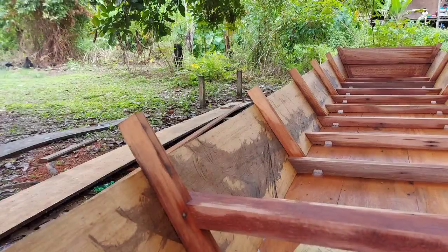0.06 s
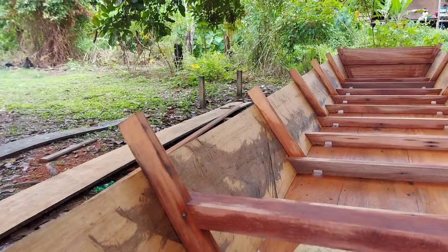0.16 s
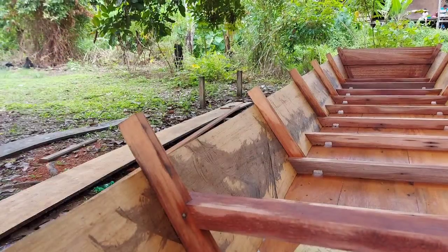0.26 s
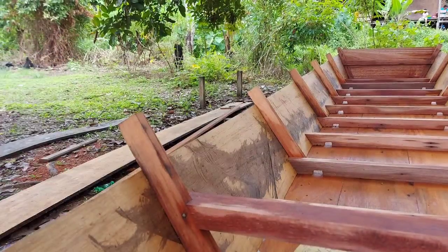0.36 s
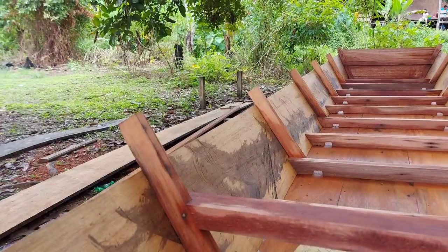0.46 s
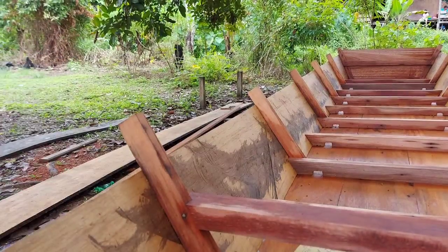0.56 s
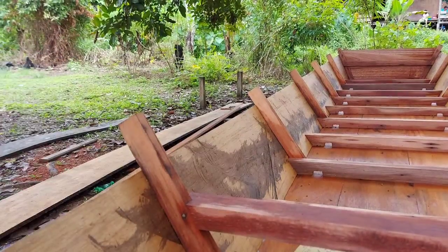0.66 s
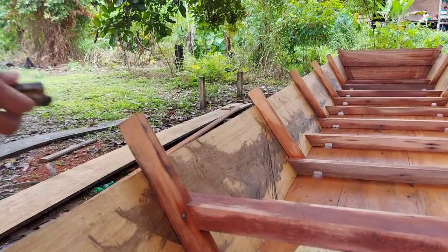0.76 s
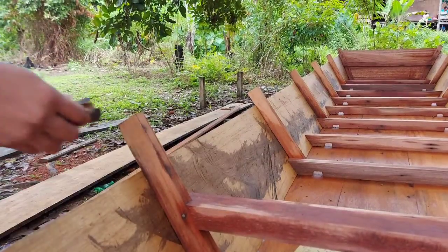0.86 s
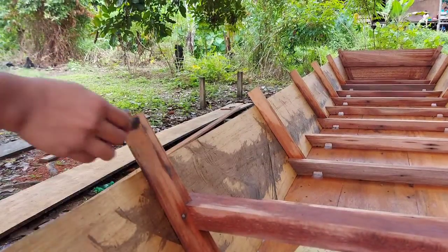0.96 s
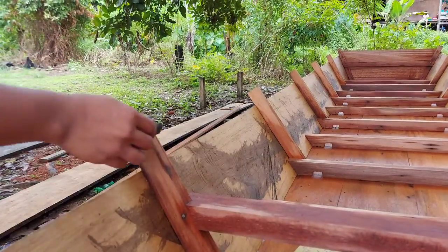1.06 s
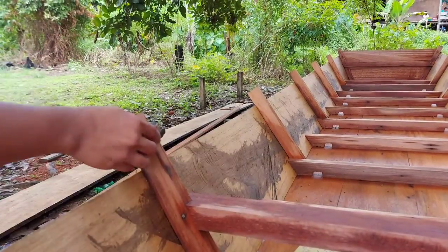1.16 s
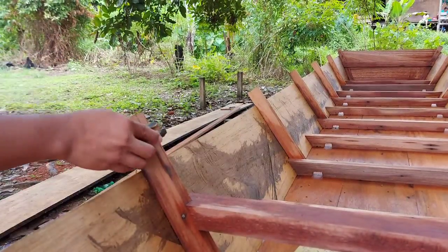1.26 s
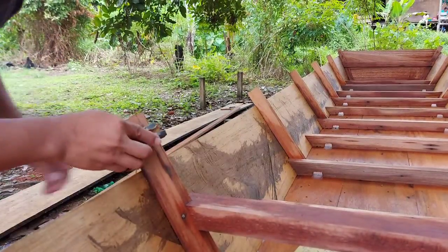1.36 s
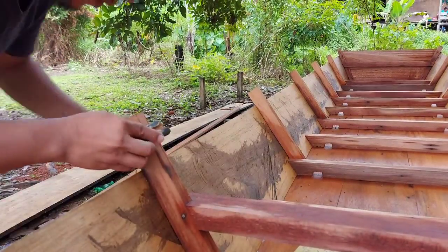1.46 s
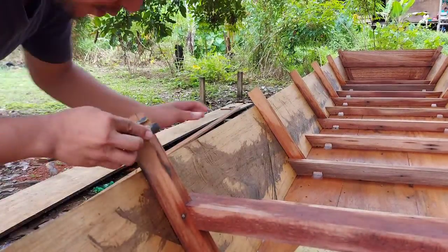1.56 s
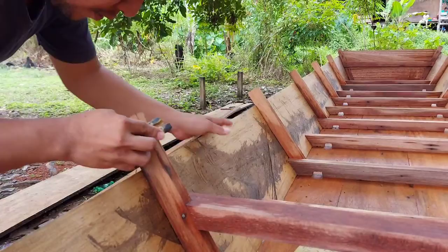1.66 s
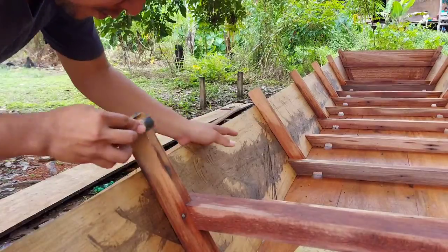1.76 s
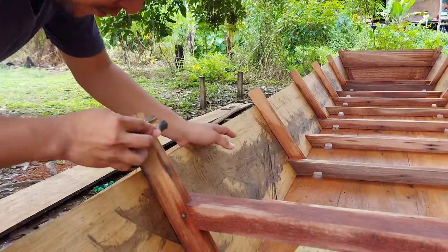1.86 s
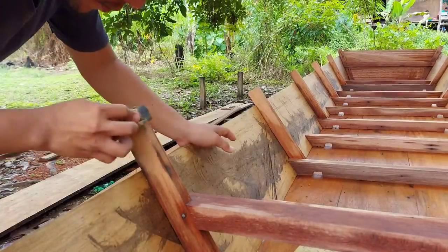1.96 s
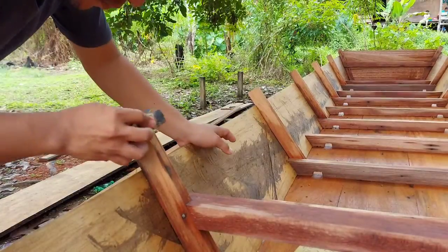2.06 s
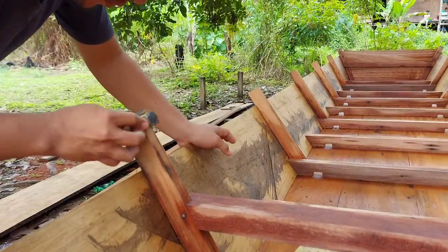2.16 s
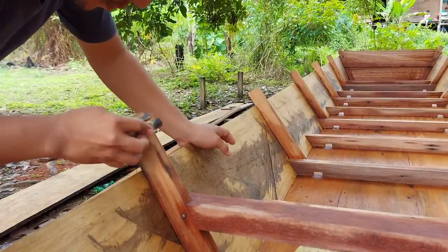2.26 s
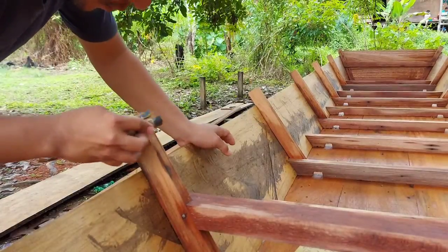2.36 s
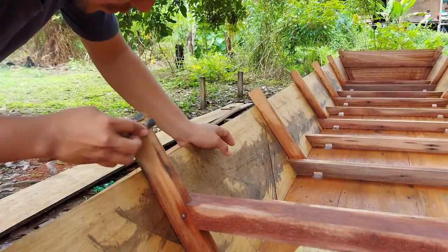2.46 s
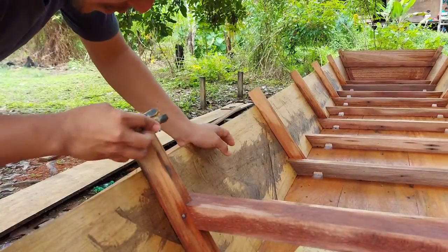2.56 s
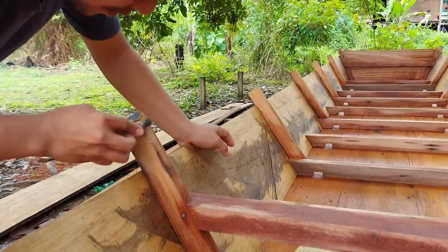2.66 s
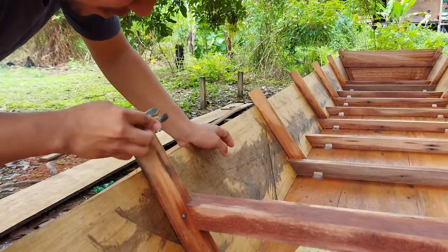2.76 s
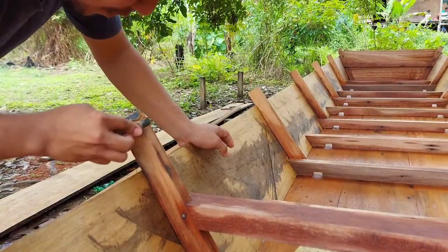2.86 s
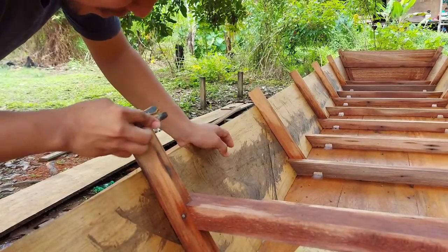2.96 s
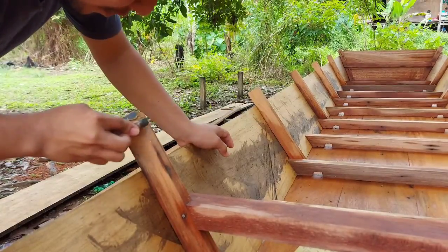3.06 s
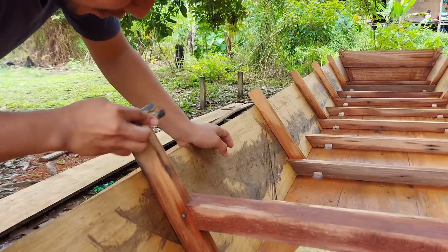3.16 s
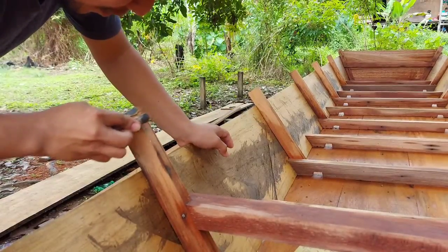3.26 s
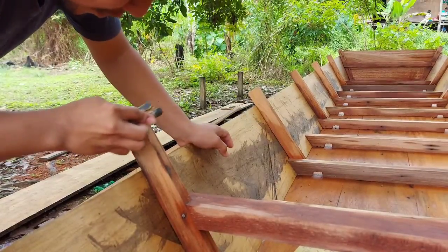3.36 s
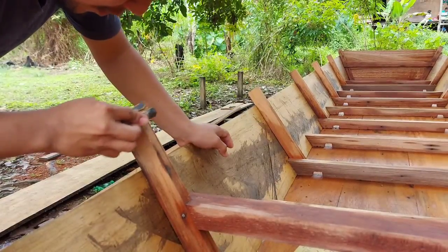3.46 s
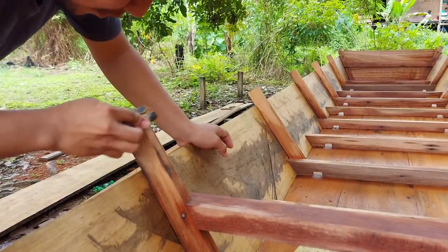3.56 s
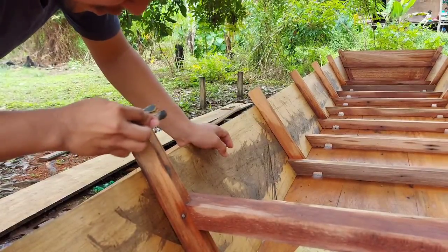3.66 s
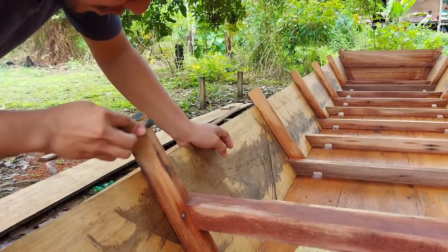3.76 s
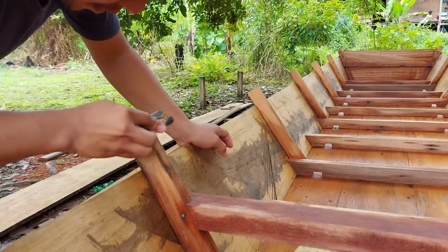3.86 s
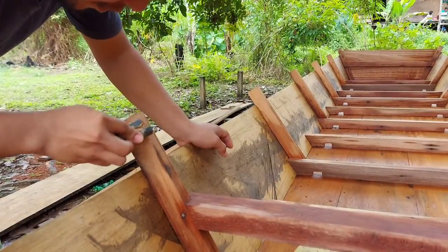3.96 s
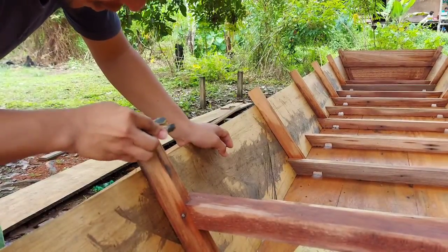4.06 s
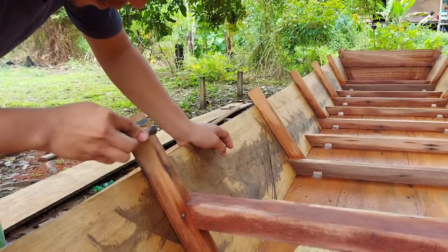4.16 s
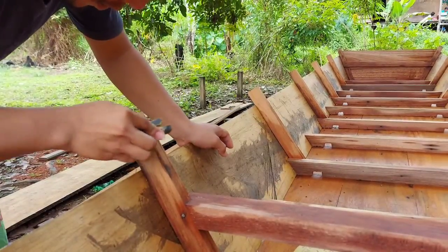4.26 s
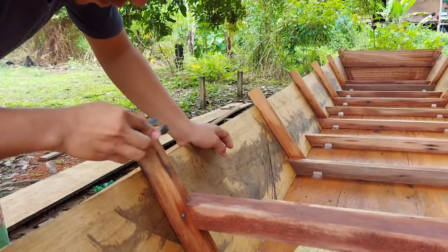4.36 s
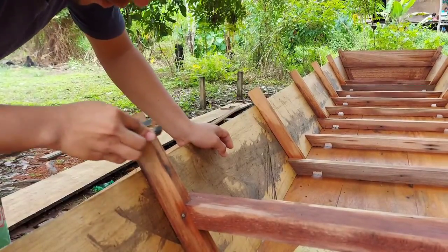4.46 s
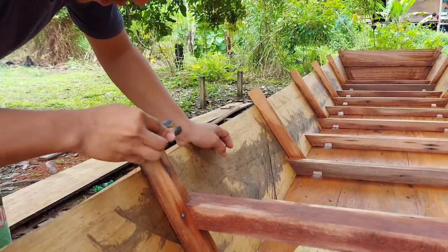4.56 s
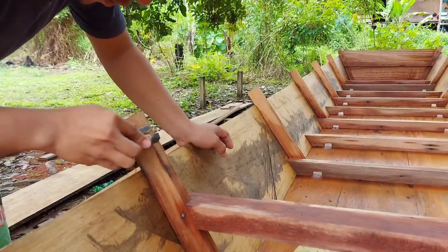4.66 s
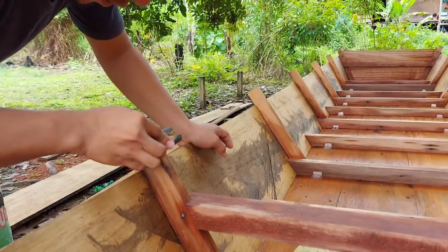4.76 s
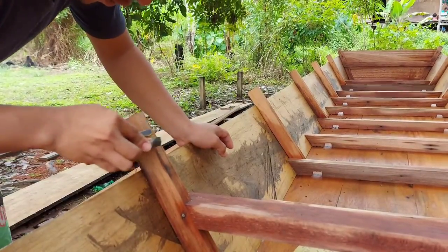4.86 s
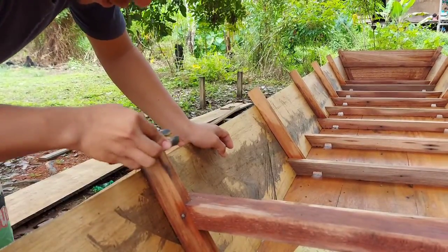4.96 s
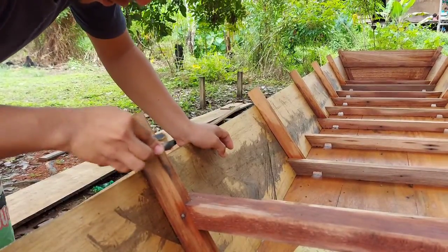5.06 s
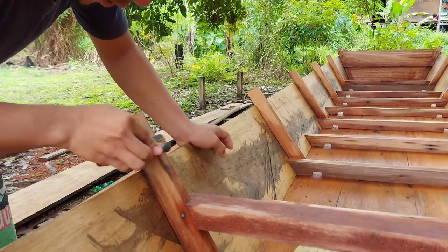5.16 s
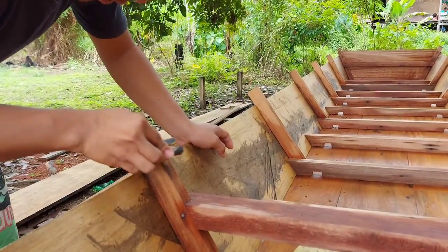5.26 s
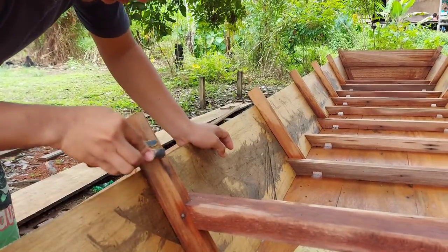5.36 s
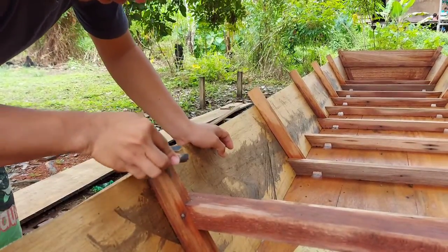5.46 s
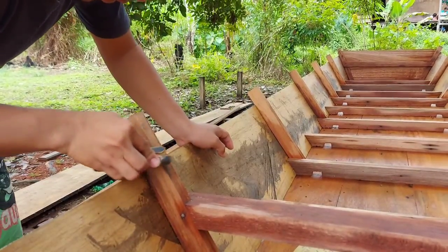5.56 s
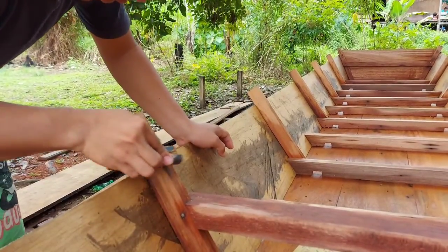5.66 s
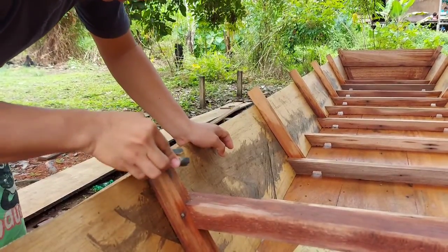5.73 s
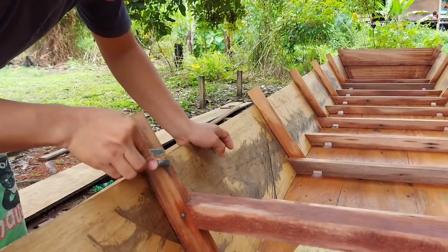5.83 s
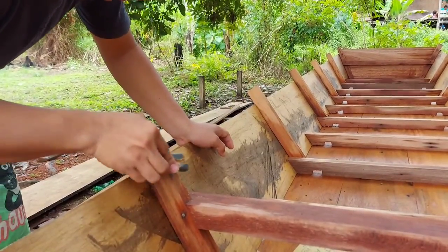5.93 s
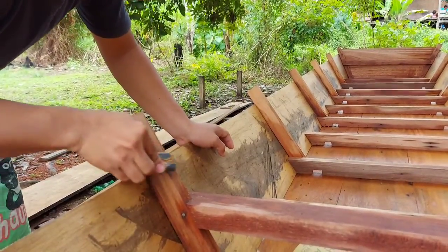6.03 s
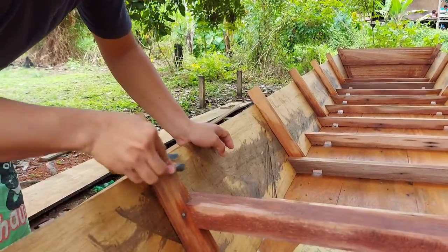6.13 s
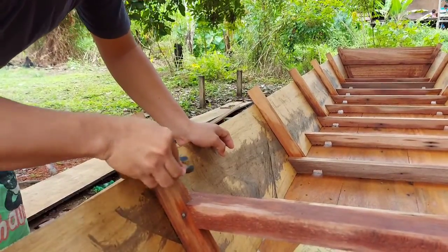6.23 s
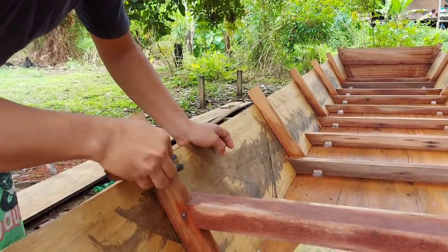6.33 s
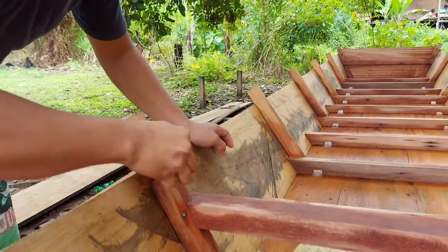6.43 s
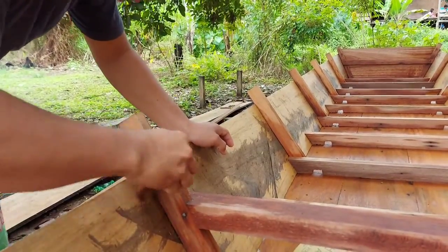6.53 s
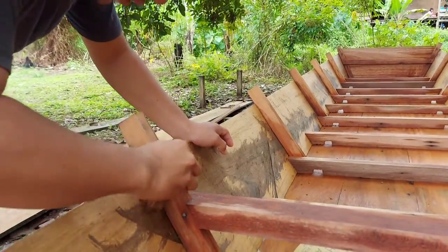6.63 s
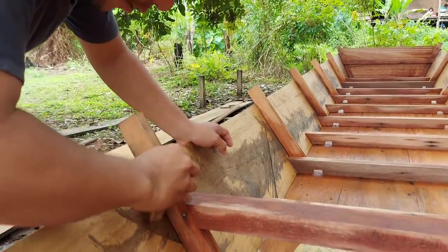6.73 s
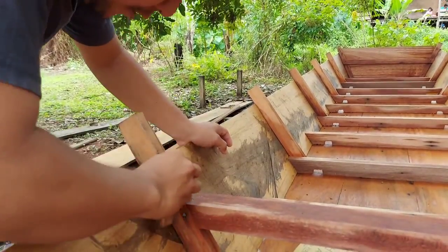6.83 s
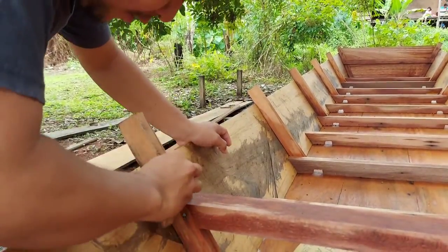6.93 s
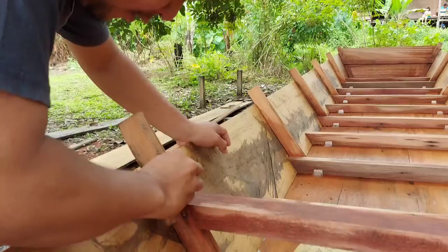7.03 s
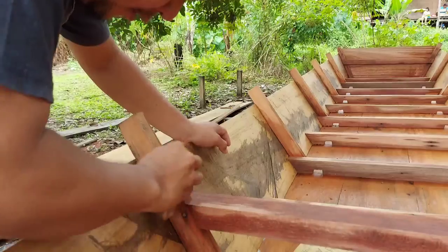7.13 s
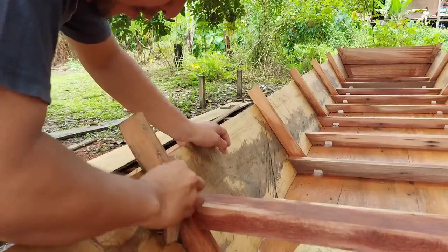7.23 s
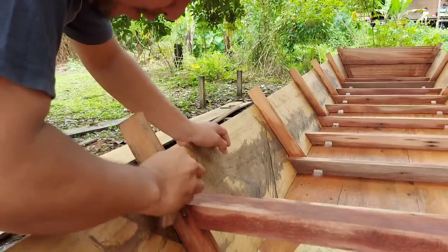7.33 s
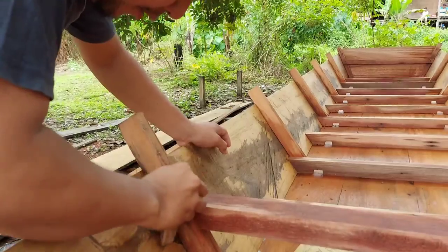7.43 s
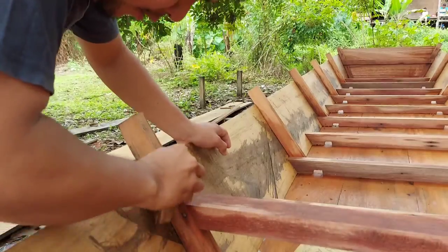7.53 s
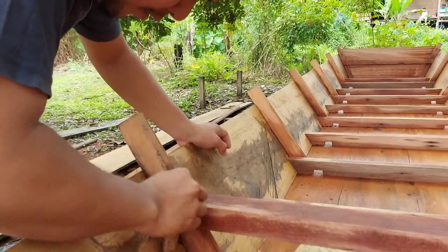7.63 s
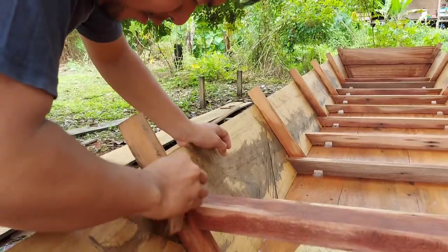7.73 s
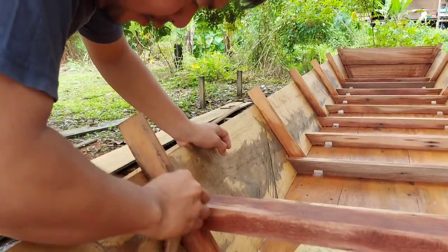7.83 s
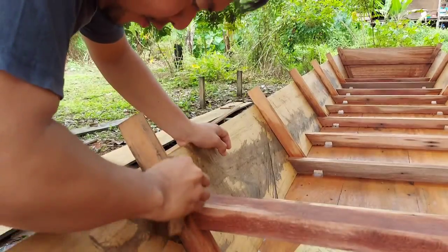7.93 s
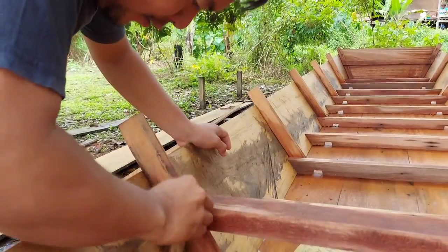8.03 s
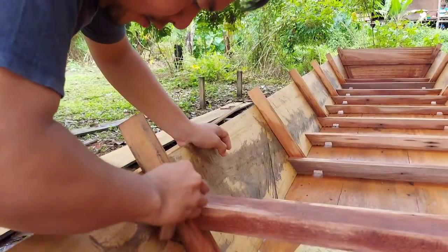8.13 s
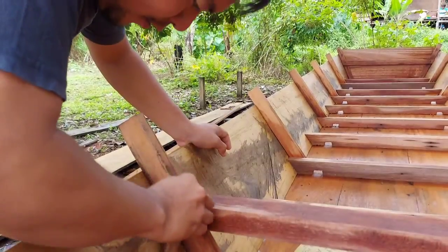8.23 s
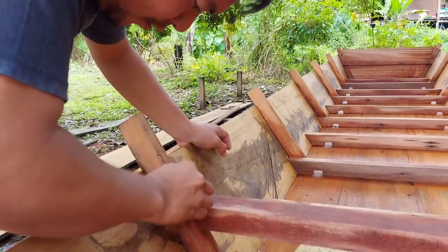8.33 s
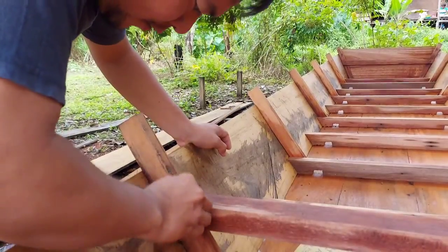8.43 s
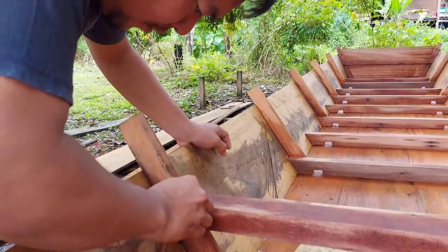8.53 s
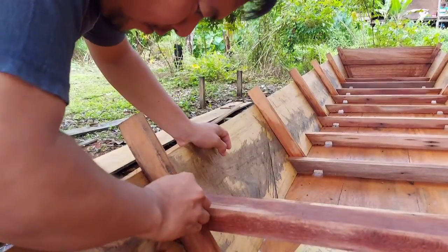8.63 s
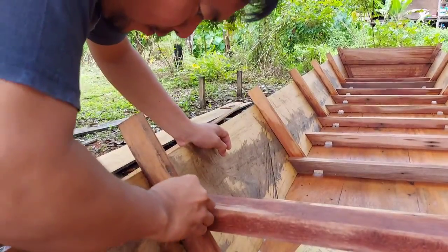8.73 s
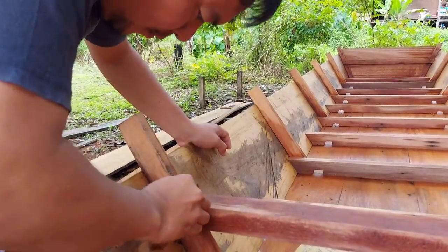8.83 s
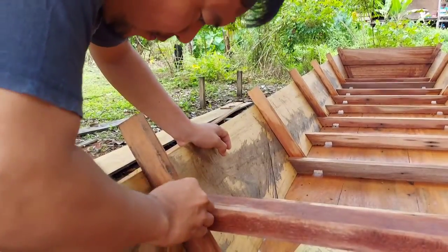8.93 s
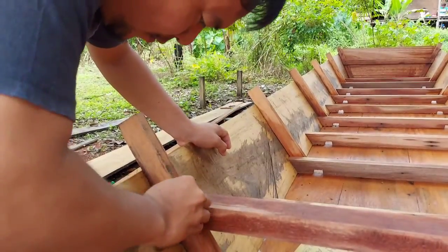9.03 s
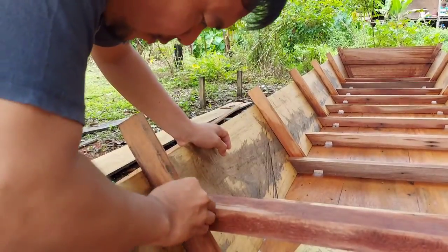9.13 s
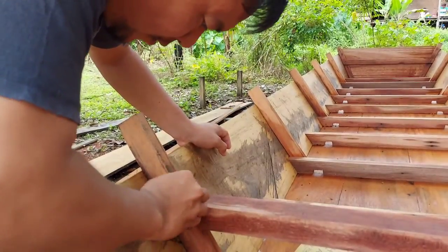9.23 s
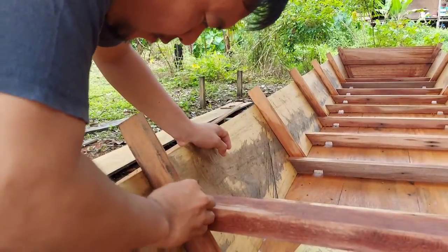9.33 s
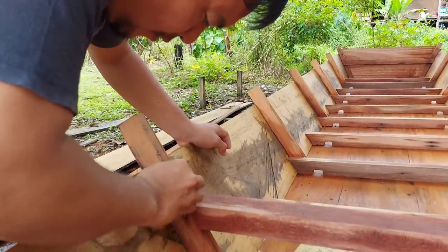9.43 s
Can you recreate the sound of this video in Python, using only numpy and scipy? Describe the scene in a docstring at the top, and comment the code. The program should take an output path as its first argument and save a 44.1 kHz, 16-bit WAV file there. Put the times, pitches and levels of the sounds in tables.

```python
"""Outdoors, close by: insects sing steadily over a low rumble and soft hiss; a few thin far whistles glide early on.
Clothes begin to rustle. A hand then rubs folded coarse sandpaper over a rib of a wooden boat, nine strokes a second:
first on its top, then gradually down towards its foot, with a short pause on the way. The grit plucks the rib, which
rings the plank hull; the paper rasps and snaps. Filtered noise, random grit clicks and short pushes drive ringing
modes and bands; the whistles are gliding sines."""
import sys
import numpy as np
from scipy import signal
from scipy.fft import rfft, irfft, next_fast_len
from scipy.io import wavfile
from scipy.ndimage import uniform_filter1d

SR = 44100
rng = np.random.default_rng(int(sys.argv[2]) if len(sys.argv) > 2 else 0)


def generate_wav(sig):
    """Save sig (samples, or channels by samples) to the path in sys.argv[1] as 16-bit PCM at SR."""
    pcm = np.round(np.clip(np.atleast_2d(sig).T, -1, 1) * 32767).astype(np.int16)
    wavfile.write(sys.argv[1], SR, pcm)


N = 418509
TIME_S = np.arange(N) / SR
TOP_HZ = 15850
REST_S = 0.2  # a longer wait for the next stroke is a rest
LIFT_DB = -15.5  # before a rest the hand lifts off: change of force over the stroke

# strokes, push and pull in turn, push first: [start_s, length_s, mid_force_db]
STROKES = [(1.172, 0.13, -40.5), (1.386, 0.07, -26.5), (1.484, 0.09, -27.5), (1.591, 0.086, -21.5),
           (1.694, 0.092, -21), (1.799, 0.098, -24.5), (1.923, 0.082, -19.5), (2.013, 0.1, -21.5),
           (2.132, 0.099, -22), (2.239, 0.096, -22.5), (2.356, 0.096, -20), (2.459, 0.1, -20),
           (2.577, 0.094, -16.5), (2.681, 0.1, -20.5), (2.793, 0.09, -18.5), (2.894, 0.098, -19.5),
           (3.002, 0.089, -16.5), (3.103, 0.106, -19.5), (3.218, 0.089, -17), (3.319, 0.11, -21),
           (3.438, 0.094, -17.5), (3.543, 0.1, -18), (3.66, 0.095, -17.5), (3.763, 0.1, -19.5),
           (3.884, 0.1, -18.5), (3.993, 0.11, -20.5), (4.116, 0.1, -21.0), (4.224, 0.103, -18.5),
           (4.344, 0.1, -19), (4.452, 0.12, -18.5), (4.578, 0.1, -18.5), (4.689, 0.097, -19.5),
           (4.803, 0.11, -23.5), (4.918, 0.097, -20), (5.039, 0.092, -21.5), (5.149, 0.097, -20.5),
           (5.276, 0.094, -24.5), (5.387, 0.11, -23.5), (5.519, 0.096, -25), (5.634, 0.092, -26),
           (5.761, 0.095, -28.5), (5.869, 0.11, -28.5), (6.002, 0.086, -29), (6.105, 0.12, -27.0),
           (6.242, 0.096, -31.5), (6.348, 0.11, -28.5), (6.502, 0.09, -35.5), (6.614, 0.083, -33),
           (6.718, 0.12, -35), (6.833, 0.078, -34.5), (7.055, 0.067, -31.5), (7.152, 0.085, -24.5),
           (7.251, 0.078, -27.5), (7.359, 0.09, -29), (7.471, 0.086, -28), (7.586, 0.083, -25),
           (7.678, 0.093, -28.5), (7.798, 0.077, -24), (7.897, 0.081, -30), (7.998, 0.076, -26.5),
           (8.096, 0.1, -31.0), (8.193, 0.082, -26.5), (8.296, 0.088, -33.5), (8.416, 0.08, -28),
           (8.578, 0.092, -43.5), (8.68, 0.064, -40), (8.762, 0.12, -41.0), (8.856, 0.084, -32.5),
           (8.978, 0.073, -32), (9.078, 0.068, -33.5), (9.175, 0.1, -35.5), (9.295, 0.081, -28.5),
           (9.402, 0.13, -33.5)]
# stroke along the rib: [place (0 top .. 1 foot), push_rise_db, pull_rise_db, push_over_pull_bass_db]
STROKE_FORM = [(0, 10, 0, -0.5), (.15, -6, 5.5, 3), (1, -5, -3.5, 0)]
# tone drift relative to the scrape: [time_s, bass_db, rasp_db]
TONE_DRIFT = [(1.2, 6, -20), (1.65, 2.5, -21), (2.2, 0.5, -20), (2.8, -1, -21.5), (3.4, -3.5, -18.5),
              (3.85, -6, -24), (4.9, -3, -23.5), (5.6, -3, -17), (6.35, -3, -18), (6.78, 4, -16),
              (7.1, -4, -18), (7.6, -4.5, -15), (8.1, -2, -14), (8.7, 5.5, -15), (9.35, -4, -16)]
# working place: [time_s, place (0 top .. 1 foot), ring_above_2khz_db]
HAND_PLACE = [(1.2, 0.021, -3.5), (3, 0.01, 2), (4.4, 0.16, 0), (5.3, 0.14, -17), (6.4, 0.42, -1),
              (6.85, 0.7, -1), (7.2, 0.69, 0.5)]
# paper snags and jolts the wood: [start_s, relative_db, contact_s]
BUMPS = [(6.769, 1.5, 0.0058), (6.851, -7.5, 0.0013), (7.401, -11.5, 0.0022), (7.486, -14, 0.00058),
         (7.624, -13, 0.00035), (8.046, -12, 0.0012), (8.185, -14.5, 0.00041), (8.455, -16, 0.001)]
# rib and hull modes, relative levels:
# [mode_hz, width_hz, top_db, foot_db, left_minus_right_db, left_lead_rad]
HULL_MODES = [(179, 11, -1, -7, -2, .1), (216, 11, -5, -6, 1, .2), (287, 21, -8, -4, 0, .1),
              (331, 34, -13, -10, -3, -.2), (371, 26, -13, -15, -5, -.9), (423, 16, -13, -10, -7, 0),
              (513, 30, -12, -14, 13, 1.1), (540, 30, -5, -5, 2, 2), (570, 26, -14, -20, 3, 0),
              (624, 25, -10, -17, 0, -1), (686, 24, -18, -24, -16, -1.2), (747, 22, -14, -18, -2, .1),
              (793, 25, -8, -19, 1, .7), (845, 38, -18, -22, 0, -.1), (886, 70, -20, -19, -3, -1.4),
              (1082, 56, -24, -34, -6, 1.3), (1147, 48, -36, -20, 13, -3.1), (1233, 45, -22, -30, -5, 2.1),
              (1355, 76, -28, -22, 9, 2.6), (1496, 57, -29, -35, 6, 1.9), (1634, 40, -28, -30, 16, 2.5),
              (1766, 38, -17, -29, 9, 3.1), (1950, 50, -27, -45, -9, -2.6), (2158, 75, -25, -39, -1, .6),
              (2322, 72, -45, -31, 9, 2.2), (2750, 60, -28, -31, -3, -1.4), (2960, 55, -33, -32, -3, 0)]
# wood between the clear modes, spectrum: [freq_hz, relative_db_per_hz]
TIMBER_SPECTRUM = [(250, -7), (450, 2.5), (850, -1.5), (1300, -2.5), (2000, -7), (2400, -14), (4500, -24)]
# paper rasp, spectrum: [freq_hz, relative_db_per_hz]
RASP_SPECTRUM = [(1500, -15), (2200, -1.5), (3000, 7.5), (3500, 2.5), (4400, 4.5), (5400, 1), (7000, -2),
                 (8800, 0), (10000, -4.5), (12000, -0.5), (13500, -12.5), (16000, -10.5)]
# stiff paper crackles: [start_s, onset_level_db, centre_hz]
CRACKLES = [(0.755, -40.5, 1780), (1.437, -35, 8800), (9.4, -34.5, 4040), (9.402, -38, 10900)]
# insect choruses: [centre_hz, nominal_width_hz, level_db, left_minus_right_db]
INSECTS = [(5850, 430, -62.5, -3), (6930, 770, -59, -6), (8760, 580, -58.5, -9), (10580, 1050, -61, 2)]
# thin far whistles, probably birds: [start_s, length_s, from_hz, to_hz, level_db]
WHISTLES = [(.2, .5, 5680, 5920, -61), (.3, .3, 3220, 3160, -62), (.5, .25, 3800, 3660, -64),
            (.57, .14, 1690, 1670, -64), (.67, .1, 1420, 1360, -65), (.66, .35, 2720, 2520, -63),
            (.93, .5, 5450, 5780, -58), (.97, .36, 2370, 2500, -61), (1.75, .4, 5500, 5750, -59)]
# rumble and hiss, spectrum: [freq_hz, relative_db_per_hz]
AIR_SPECTRUM = [(20, -28), (40, -13), (68, 3), (85, -1.5), (105, 3.5), (160, -4), (230, -18), (320, -14.5),
                (600, -34.5), (1500, -44.5), (2700, -31), (3700, -27), (11000, -39), (13000, -40),
                (16000, -51)]


def undb(db):
    """Decibels to gain."""
    return 10 ** (np.asarray(db) / 20)


def unit(x):
    """Scale to rms 1."""
    return x / np.sqrt(np.mean(x ** 2))


def pan(left_minus_right_db):
    """Left and right gains for a level difference."""
    return undb(np.array([[left_minus_right_db], [-left_minus_right_db]]) / 2)


def along(table, at):
    """Read the columns of a table at a value of its first column."""
    first, *columns = np.transpose(table)
    return [np.interp(at, first, column) for column in columns]


def add(out, start_s, x):
    """Mix a short sound in at its time."""
    i = max(int(start_s * SR), 0)
    out[..., i:i + x.shape[-1]] += x[..., :max(N - i, 0)]


def walk(rate_hz):
    """Random course of rms near 1: straight lines between rate_hz new values a second."""
    points = rng.standard_normal(4096)
    # interpolation loses a third of the power
    return np.interp(TIME_S * rate_hz, np.arange(len(points)), points) * np.sqrt(3 / 2)


def colour(x, spectrum):
    """Filter by (Hz, dB) points, joined on a log frequency axis."""
    size = next_fast_len(N)
    freq_hz, level_db = np.transpose(spectrum)
    bin_hz = np.maximum(np.fft.rfftfreq(size, 1 / SR), 1)
    gain = undb(np.interp(np.log(bin_hz), np.log(freq_hz), level_db))
    return irfft(rfft(x, size) * gain, size)[..., :N]


def band(x, centre_hz, width_hz):
    """One broad resonance, gain 1 at its centre."""
    b, a = signal.iirpeak(centre_hz, centre_hz / width_hz, fs=SR)
    return signal.lfilter(b, a, x)


def double_band(x, centre_hz, width_hz):
    """Two equal resonances in series: steeper skirts."""
    return band(band(x, centre_hz, width_hz), centre_hz, width_hz)


def scatter(x, t60_s):
    """Dense short ring by separate random paths to each ear; t60_s holds before the peaks are flattened."""
    t = TIME_S[:8192]
    paths = rfft(rng.standard_normal((2, len(t))) * undb(-60 * t / t60_s))
    # the square root of the magnitude leaves only mild peaks and dips
    tails = irfft(paths / np.sqrt(np.abs(paths)))[:, :len(t) // 2]
    return np.array([signal.oaconvolve(x, tail / np.linalg.norm(tail))[:N] for tail in tails])


def sanding():
    """Grit drives the hull's clear modes, the dense modes between them and the rasp of the paper."""
    place, bright_db = along(HAND_PLACE, TIME_S)
    place = np.clip(place, 0, 1)
    scrape, bass, rasp = hand(place)
    grains = grit(per_s=4000, spread_db=1.0)

    timber_drive = unit(colour(grains, TIMBER_SPECTRUM)) * scrape
    timber = undb(-15.0 + 4.7 * place) * scatter(timber_drive, t60_s=0.05)
    paper_drive = unit(colour(grit(per_s=4000, spread_db=2.0), RASP_SPECTRUM)) * rasp
    paper = pan(-6.5) * scatter(paper_drive, t60_s=0.017)

    near = flex(hull(scrape, bass, place, bright_db)) + timber + paper + rocking(grains, bass, place)
    # a faint echo returns from the far planks and the garden
    return near + undb(-24) * scatter(near.mean(axis=0), t60_s=0.2)


def hand(place, early=0.67, scrape_curve=1.0, bass_curve=0.35, rasp_curve=1.17, snag_db=5, snag_s=0.015):
    """Strength of scrape, bass and rasp: brisk start, slowing, turn; the treble needs the most speed."""
    out = np.zeros((3, N))
    waits_s = np.diff(np.array(STROKES)[:, 0], append=N / SR)
    for k, ((start_s, length_s, force_db), wait_s) in enumerate(zip(STROKES, waits_s)):
        # the arm bears down differently going out and coming back
        push_rise_db, pull_rise_db, push_bass_db = along(STROKE_FORM, np.interp(start_s, TIME_S, place))
        is_pull = k % 2
        rise_db = pull_rise_db if is_pull else push_rise_db
        lean_db = -0.5 * push_bass_db if is_pull else 0.5 * push_bass_db
        if wait_s > REST_S:
            rise_db = LIFT_DB
        bass_db, rasp_db = along(TONE_DRIFT, start_s)
        way = np.linspace(0, 1, int(length_s * SR))
        speed = np.abs(np.sin(np.pi * way ** early))
        force = undb(force_db + rise_db * (way - 0.5))
        scrape = speed ** scrape_curve
        bass = undb(bass_db + lean_db) * speed ** bass_curve
        rasp = undb(rasp_db) * speed ** rasp_curve
        add(out, start_s, force * np.array([scrape, bass, rasp]))
    # the paper grips and slips unevenly, more so in the cramped corner at the foot
    grip_db = (1.3 + 0.58 * place) * walk(rate_hz=90) + 1.11 * walk(rate_hz=410)
    for start_s, _, _ in BUMPS:
        add(grip_db, start_s - snag_s / 2, snag_db * np.hanning(int(snag_s * SR)))
    # it never quite leaves the wood: a faint drag fills the turns
    drag = undb(-20 + 2.1 * place) * uniform_filter1d(out, size=9000)
    return np.hypot(out, drag) * undb(grip_db)


def grit(per_s, spread_db):
    """Grains that snag and tear free at random: many weak, a few strong."""
    hit = rng.random(N) < per_s / SR
    sign = rng.choice([-1, 1], N)
    strength = undb(spread_db * np.minimum(rng.exponential(size=N), 2 * np.pi))
    return unit(hit * sign * strength)


def hull(scrape, bass, place, bright_db, bass_below_hz=450, bright_above_hz=2050,
         patchy_db=2.5, gain_db=27, skirt=4.5):
    """Friction rings the modes; their shares change as the contact moves along the rib."""
    out, knocks = np.zeros((2, N)), bumps()
    for mode_hz, width_hz, top_db, foot_db, pan_db, lead_rad in HULL_MODES:
        share_db = gain_db + top_db + (foot_db - top_db) * place
        share_db = share_db + bright_db * (mode_hz > bright_above_hz) + patchy_db * walk(rate_hz=16)
        # thousands of grains lie spread over the contact: each mode feels its own sum
        force = rng.standard_normal(N) * (bass if mode_hz < bass_below_hz else scrape) + knocks
        drive = band(undb(share_db) * force, mode_hz, skirt * width_hz)
        pole = np.exp((2j * mode_hz - width_hz) * np.pi / SR)
        ring = signal.lfilter([2 * (1 - abs(pole))], [1, -pole], drive)
        # different planks face the two ears: own level and lag per mode
        phase = np.exp(0.5j * lead_rad * np.array([[1], [-1]]))
        out += (pan(pan_db) * phase * ring).real
    return out


def bumps(gain_db=19):
    """Short pushes on the wood; a longer contact is duller."""
    out = np.zeros(N)
    for start_s, relative_db, contact_s in BUMPS:
        push = np.hanning(int(contact_s * SR) + 2)
        add(out, start_s, undb(relative_db + gain_db) * push / push.sum())
    return out


def flex(x, sway_s=0.0003):
    """The changing pressure of the hand pulls the ring slightly up and down in pitch: a wavering delay."""
    bent_s = TIME_S + sway_s * walk(rate_hz=12)
    return np.array([np.interp(bent_s, TIME_S, ear) for ear in x])


def rocking(grains, bass, place):
    """The pushing arm rocks the whole boat, most when low on the rib: grit through low resonances."""
    low = unit(band(band(grains, 61.0, 22), 82, 11.5))
    high = unit(double_band(grains, 107, 42))
    return (low + high) * uniform_filter1d(bass, size=4000) * undb(-23.0 + 18 * place)


def crackles(decay_s=0.0075):
    """Dry snaps of the folded paper: noise bands with a sudden onset and exponential decay."""
    out, t = np.zeros((2, N)), TIME_S[:2048]
    for start_s, level_db, centre_hz in CRACKLES:
        snap = double_band(rng.standard_normal((2, len(t))), centre_hz, centre_hz)
        add(out, start_s, undb(level_db) * unit(snap) * np.exp(-t / decay_s))
    return out


def rustle(from_s=0.36, full_s=0.49, low_hz=560, high_hz=1600):
    """Clothes brush softly as the worker reaches for the rib: two noise bands fade in and stay."""
    folds = 0
    for centre_hz in (low_hz, high_hz):
        folds = folds + unit(double_band(rng.standard_normal((2, N)), centre_hz, centre_hz / 2))
    fade = np.interp(TIME_S, [from_s, full_s], [0, 1])
    return folds * fade * undb(-70.5 + 2 * walk(rate_hz=20))


def insects(flicker_db=0.7):
    """Many far insects merge into steady shrill bands of noise."""
    out = 0
    for centre_hz, width_hz, level_db, pan_db in INSECTS:
        # two passes narrow the band, so each is made wider
        chorus = unit(double_band(rng.standard_normal((2, N)), centre_hz, width_hz * 1.25))
        out = out + chorus * pan(pan_db) * undb(level_db + flicker_db * walk(rate_hz=30))
    return out


def whistles(waver=0.0056):
    """Slow, wavering sine glides, smeared by the trees."""
    out, wobble = np.zeros(N), 1 + waver * walk(rate_hz=170)
    for start_s, length_s, from_hz, to_hz, level_db in WHISTLES:
        n = int(length_s * SR)
        pitch_hz = np.linspace(from_hz, to_hz, n) * wobble[:n]
        tone = np.sin(2 * np.pi * np.cumsum(pitch_hz) / SR)
        add(out, start_s, undb(level_db) * np.sqrt(2 * np.hanning(n)) * tone)
    return scatter(out, t60_s=0.34)


def air(apart_hz=550):
    """Far rumble, alike in both ears, under a soft hiss of foliage that differs between them."""
    mid, side = rng.standard_normal((2, N))
    side = signal.sosfilt(signal.butter(2, apart_hz, "high", fs=SR, output="sos"), side)
    both = unit(colour(mid + side * np.array([[1], [-1]]), AIR_SPECTRUM))
    return both * pan(-2.1) * undb(-46.5 + 0.32 * walk(rate_hz=4.0))


def scene():
    """The sanding close by, the garden behind it."""
    return sanding() + crackles() + rustle() + insects() + whistles() + air()


def record(dry):
    """Steep low-pass: nothing audible remains far above TOP_HZ."""
    return signal.sosfilt(signal.ellip(10, 0.2, 80, TOP_HZ, fs=SR, output="sos"), dry)


dry = scene()
out = record(dry)
generate_wav(out)
```